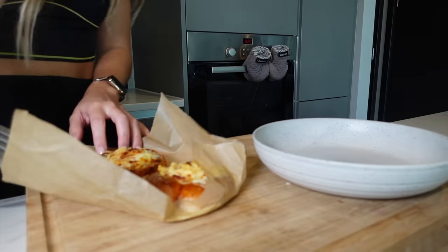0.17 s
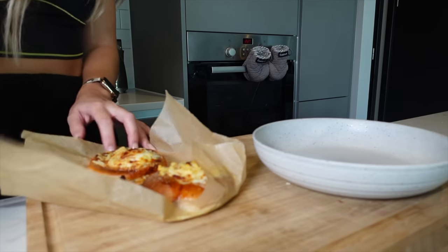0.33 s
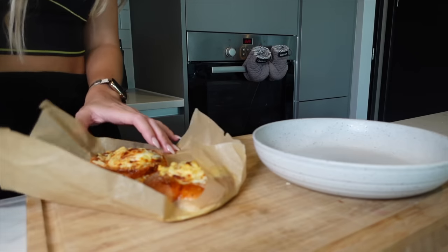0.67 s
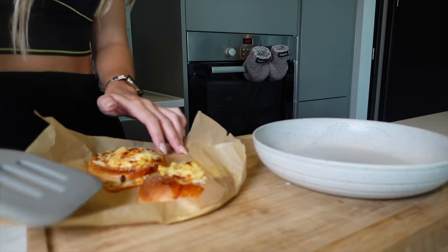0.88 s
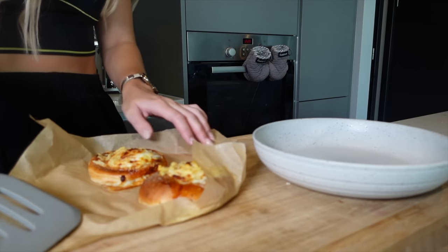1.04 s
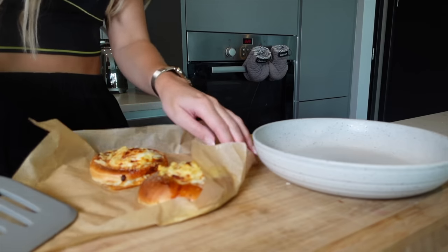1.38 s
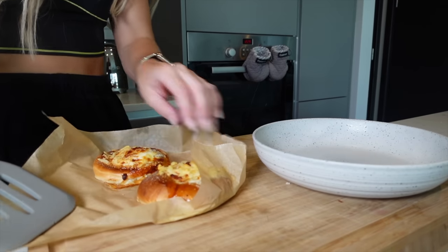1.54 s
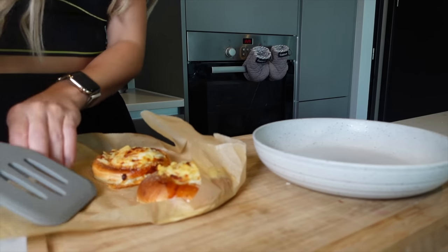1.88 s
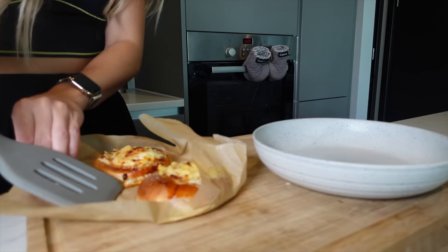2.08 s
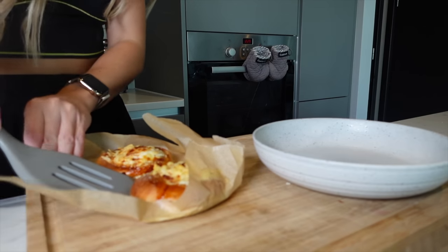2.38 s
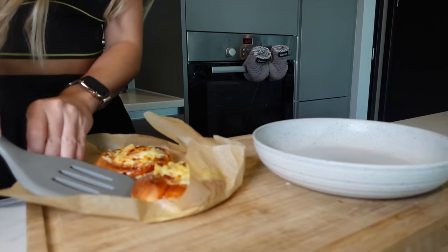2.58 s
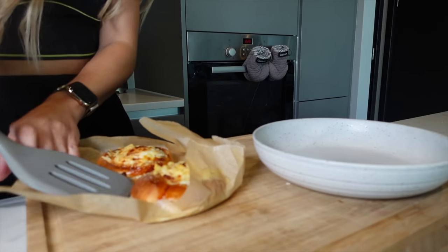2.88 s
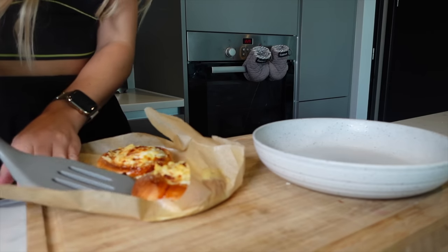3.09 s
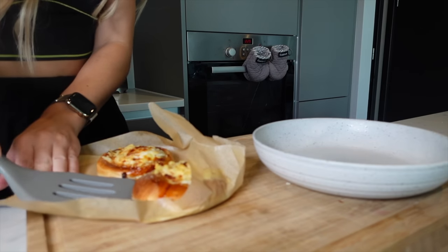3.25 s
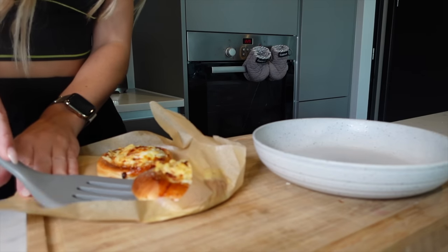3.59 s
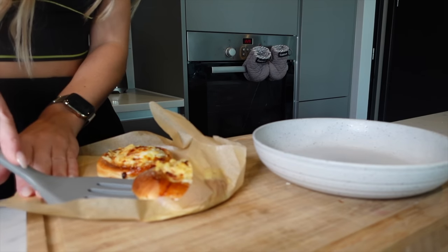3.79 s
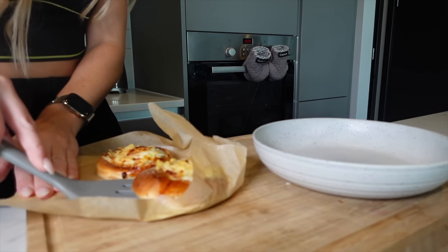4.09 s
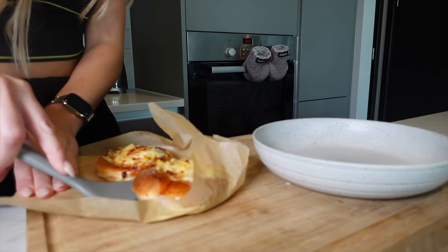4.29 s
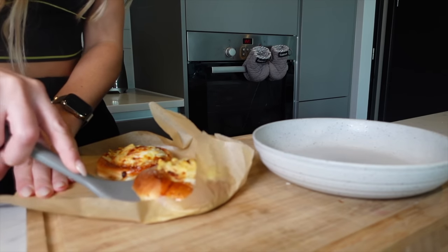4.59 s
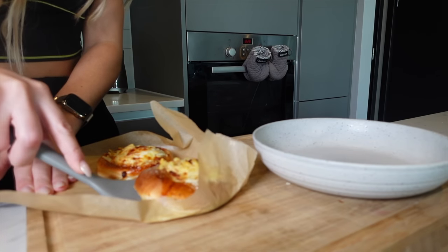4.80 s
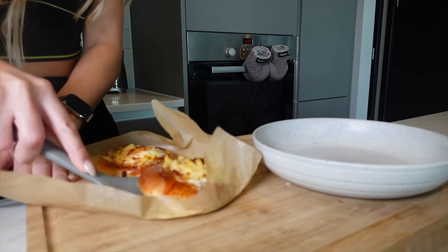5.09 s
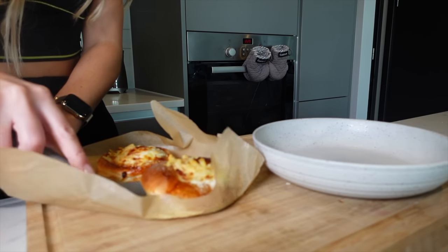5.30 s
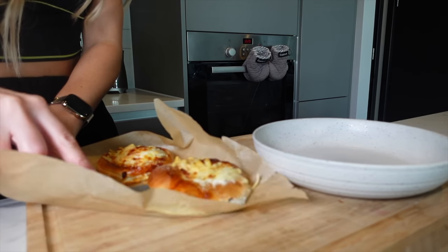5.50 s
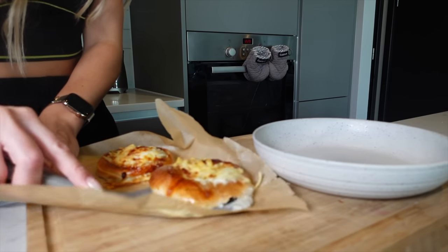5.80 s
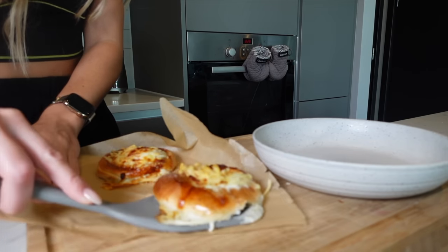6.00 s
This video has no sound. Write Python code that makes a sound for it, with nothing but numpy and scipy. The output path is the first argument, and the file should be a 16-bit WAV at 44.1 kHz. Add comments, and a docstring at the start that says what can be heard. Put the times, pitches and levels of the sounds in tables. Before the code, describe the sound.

Stiff baking paper crackles densely close up for three seconds, thins to faint rustling, then crunches briefly again in a hard-walled kitchen.

```python
"""A stiff sheet of baking paper is pulled open, pressed flat and scraped by a spatula on a board in a kitchen.
For 3 s creases buckle in dense sharp snaps, each ringing a small patch; tiny ones rustle, sliding surfaces hiss.
Then the snaps thin out and the rustle and hiss weaken; from about 5.4 s a last run of crunches follows, to 6.14 s.
Throughout, broad panels pop low now and then, hard walls answer and a low appliance rumble lies beneath."""
import sys
import numpy as np
from scipy import signal
from scipy.fft import rfft, irfft
from scipy.io import wavfile
from scipy.ndimage import uniform_filter1d

SR = 44100
rng = np.random.default_rng(int(sys.argv[2]) if len(sys.argv) > 2 else 0)


def dump(signal):
    """Clip the signal to [-1, 1] and save it as 16-bit WAV at the path in sys.argv[1]."""
    limited = np.clip(np.atleast_2d(signal).T, -1, 1)
    pcm = np.round(limited * 32767).astype(np.int16)
    wavfile.write(sys.argv[1], SR, pcm)


N = 270906

# Loud snaps of single creases: (time [s], patch peak [dB], patch pitch [Hz],
# crack peak re patch [dB], slip decay [ms])
SNAP_EVENTS = [(0.0453, -7, 2450, 0, 1), (0.1505, -6.5, 5700, -16, 26), (0.273, -5, 1830, -9, 1),
               (0.2724, -4.5, 5650, -26, 0.75), (0.304, -7, 5800, -32, 1), (0.36, -7, 5140, -19, 0.92),
               (0.4632, -5, 3490, -21, 3.1), (0.483, -7.5, 2570, -4, 0.88), (0.5384, -6, 6000, -9, 1),
               (0.647, -9.5, 5700, -2, 1.8), (0.72, -11.5, 3450, -17, 1.1), (0.733, -8, 6100, -14, 2.7),
               (0.844, -7.5, 5680, -8, 0.99), (0.8797, -4, 3520, -14, 9.6), (1.0034, -5.5, 4100, -16, 1.5),
               (1.015, -4.5, 3840, -15, 2.3), (1.027, -5.5, 5500, -14, 2.7), (1.0354, -7, 6500, -21, 1.6),
               (1.1023, -3.5, 6300, -7, 0.56), (1.2028, -11.5, 2650, -5, 1.9),
               (1.2962, -8, 3670, -12, 0.78), (1.317, -6, 3540, -10, 0.74), (1.3313, -5, 5210, -10, 1.3),
               (1.3812, 0, 3070, -32, 0.43), (1.4041, -11.5, 3800, -13, 0.8), (1.446, 3, 2220, -18, 0.71),
               (1.46, -16, 2290, -15, 1.6), (1.5127, -11, 3190, -16, 0.43), (1.5695, -8, 4870, -18, 0.59),
               (1.5753, -1.5, 1100, -10, 1.1), (1.5958, -4.5, 5170, -7, 0.8),
               (1.6138, -7.5, 2870, -13, 1.7), (1.6414, -8.5, 5760, -6, 2.8), (1.661, -7.5, 3200, -14, 2.4),
               (1.68, -3, 4530, -1, 0.48), (1.722, -11.5, 2500, -21, 4.4), (1.745, -5, 8200, -10, 3.7),
               (1.8182, -6.5, 2600, -2.5, 3.7), (1.8642, -9, 2810, -20, 0.57),
               (1.9099, -6, 6000, -5.5, 1.06), (1.981, -8, 4400, -23, 0.96), (2.0322, -1, 4750, -10, 0.32),
               (2.047, -7, 3830, 1.5, 1.2), (2.119, -6.5, 1810, -14, 1.3), (2.1466, -9, 5500, -3, 1.5),
               (2.165, -11, 1900, -9, 0.46), (2.1972, -6.5, 4200, -12, 1.6), (2.2319, -2.5, 2980, -16, 1.9),
               (2.3097, -10, 6100, -5, 1.3), (2.3381, -3.5, 2420, -20, 0.2), (2.362, -16, 3570, -15, 1.5),
               (2.382, -3.5, 3790, -8, 0.61), (2.3848, -10, 3000, -6, 1.2), (2.4052, -10, 3660, -7, 1.5),
               (2.4076, -6, 5000, -4, 0.87), (2.417, 1.5, 2000, -25, 2.1), (2.4365, -5, 5900, -4, 4.9),
               (2.5057, -4.5, 2300, -6, 0.76), (2.545, -11, 4650, -15, 1), (2.587, -7.5, 5770, -1, 0.57),
               (2.614, -4, 7440, -28, 1.05), (2.6308, -7.5, 5500, -1.5, 7), (2.6507, -5, 6800, -22, 4.4),
               (2.683, -8, 2320, -10, 2.3), (2.7507, -3.5, 5460, -8, 2.2), (2.8223, -13, 3720, -2, 2),
               (2.837, -0.5, 2150, -22, 1.3), (2.8876, -14, 3400, -7, 6), (2.9347, -5, 5860, -5, 2.6),
               (2.9598, -10, 4270, -5, 2.1), (2.9773, -5.5, 3940, -12, 13), (3.0192, -9.5, 6400, -8, 2),
               (3.037, -12, 8500, 3, 0.6), (3.096, -15.5, 4890, -1, 2.2), (3.1533, -9, 5260, -6.5, 1.5),
               (3.159, -17, 6000, 6, 1), (3.2565, -16, 2630, 7, 0.59), (3.268, -5, 3320, -25, 0.28),
               (3.2782, -10, 4850, -2, 1.8), (3.301, -5.5, 4130, -46, 0.79), (3.3234, -13.5, 3470, -6, 1.4),
               (3.428, -20, 2650, -21, 1.7), (3.467, -14, 4040, -15, 0.26), (3.513, -9, 3800, -34, 1.14),
               (3.567, -15, 2240, -16, 4.6), (3.618, -6, 4300, -29, 0.65), (3.629, -12, 3500, -1, 1.6),
               (3.6665, -19, 8400, 2, 0.6), (3.6902, -14, 3150, -11, 0.29), (3.6953, -10, 3300, -15, 0.78),
               (3.817, -18, 2920, -4, 0.45), (3.945, -16, 3600, -18, 2.5), (4.1, -11.5, 3740, -15, 1.7),
               (4.1508, -21, 3720, -17, 0.44), (4.2158, -9.5, 2560, -13, 3), (4.285, -23, 2860, -16, 2.5),
               (4.3, -11, 8900, -0.5, 0.92), (4.393, -18, 3520, -12, 2.5), (4.436, -14.5, 3750, -28, 1.6),
               (4.597, -29.5, 4300, -19, 1.2), (4.6398, -11.5, 6000, -21, 0.38),
               (4.6764, -16, 4640, -15, 1.4), (4.7236, -11, 3860, -24, 0.25), (4.726, -8, 3800, -27, 0.3),
               (4.829, -24, 3100, -20, 0.78), (4.8418, -25.5, 4100, -29, 1.9),
               (4.9004, -28, 2860, -10, 5.2), (4.917, -24.5, 3500, -4, 2.3),
               (5.0079, -6.5, 3850, -26, 0.55), (5.0446, -10.5, 3880, -19, 0.51),
               (5.1327, -23, 4570, -4, 0.86), (5.204, -16, 5900, -11, 0.43), (5.2236, -10, 3400, -16, 0.96),
               (5.2615, -9.5, 5870, -16, 2), (5.3597, -12.5, 5300, -14, 1.9), (5.4042, -4, 4600, -26, 0.88),
               (5.4236, -16, 8500, -8, 1), (5.43, -11.5, 3500, -17, 3.2), (5.4458, -5, 3300, -17, 1.1),
               (5.4603, -17, 4200, 0, 0.76), (5.48, -7.5, 3580, -10, 2), (5.5, -14, 3460, -14, 3.5),
               (5.523, -12, 3600, -16, 4.2), (5.5423, -17, 3570, -2, 1.5), (5.549, -8.5, 3300, -23, 4.5),
               (5.581, -9, 7550, 1, 1), (5.585, -8, 3500, -18, 0.8), (5.5998, -8.5, 2800, -5, 2.5),
               (5.619, -8, 5600, -9, 0.6), (5.713, -11, 6240, -2, 0.4), (5.817, -12, 5930, -8, 0.45),
               (5.8275, -9.5, 2170, -18, 0.53), (5.8519, -1, 6560, -3, 0.74),
               (5.9325, -1.5, 5740, -4, 0.88), (5.9662, -8, 7750, -24, 0.59),
               (6.0508, -10, 7700, -26, 0.23), (6.0612, -5, 5970, -0.5, 1.04)]
# Crunches, each a fold or push of the sheet: (start [s], rustle level [dB], hold [ms],
# fizz re rustle [dB], large-area flexing re rustle [dB], centre pitch [Hz])
CRUNCH_EVENTS = [(0.0, -19, 42, -12.5, -10.5, 3330), (0.134, -17, 11, -7.5, -8, 3700),
                 (0.341, -22.5, 13, -7.5, -15, 4330), (0.46, -23, 29, -5.5, -10, 4200),
                 (0.574, -23.5, 17, -9.5, -12, 3970), (0.645, -21.5, 20, -11, -18, 3800),
                 (0.82, -26.5, 56, -9, -8, 3700), (0.868, -17, 6.8, -12, -16, 3780),
                 (0.992, -21.5, 70, -7, -14.5, 4870), (1.254, -26, 8.8, -4, -15, 3660),
                 (1.33, -21, 61, -15, -11, 3120), (1.435, -18, 13, -16, -12, 3000),
                 (1.505, -21, 85, -15.5, -6, 3230), (1.589, -19.5, 83, -13.5, -13.5, 3200),
                 (1.808, -16, 6.3, -15, -12, 3430), (1.906, -25.5, 31, -15, -17, 3630),
                 (2.046, -19.5, 44, -15, -17, 4050), (2.14, -23, 49, -21, -18, 3850),
                 (2.284, -26, 230, -27, -10, 3350), (2.397, -23, 60, -2, -20, 3920),
                 (2.46, -26, 32, 7, -10, 4300), (2.606, -24.5, 97, -10.5, -14.5, 3830),
                 (2.741, -17.5, 9.4, -13, -10.5, 3700), (2.818, -23.5, 9.1, -15, -9.5, 3600),
                 (2.926, -16.5, 9.3, -18, -11.5, 3520), (2.969, -15.5, 7.5, -12, -12.5, 3580),
                 (3.09, -27.5, 6.8, -12, -28, 3700), (3.155, -32, 79, -16, -14, 3780),
                 (3.252, -26.5, 36, -7, -20.5, 3930), (3.509, -35, 51, 2, -15, 4260),
                 (3.551, -24.5, 14, -16, -20, 4300), (3.685, -34, 33, -9, -17, 3550),
                 (3.93, -33, 23, -9.5, -31, 4500), (4.662, -36, 12, -15, -19, 4030),
                 (4.9, -38.5, 18, -32, -11, 3100), (5.004, -28, 11, -16.5, -19, 3700),
                 (5.271, -29.5, 6, -11, -16, 4000), (5.429, -27, 85, -17, -11, 3900),
                 (5.479, -25, 66, -15.5, -17.5, 3700), (5.58, -23.5, 31, -21, -23, 3240),
                 (5.689, -25, 17, -31, -17.5, 3360), (5.805, -25, 67, -17, -18, 3600),
                 (5.926, -26, 35, -4, -13.5, 3930), (6.056, -30, 23, -3, -17, 3930),
                 (6.128, -24.5, 20, -8, -18, 4100)]
# Sheet dragged along between crunches: (time [s], rustle level [dB],
# fizz re rustle [dB], flexing re rustle [dB])
DRAG_CURVE = [(0, -34.5, -16, -8.5), (0.75, -27.5, -19, -12.5), (1.2, -29.5, -18.5, -11),
              (1.5, -28.5, -17, -20), (2.0, -32, -14, -8.5), (2.3, -26.5, -12, -16.5),
              (2.9, -40.5, -37, -14), (3.4, -34.5, -17.5, -14), (3.75, -35, -17, -18),
              (4.0, -36, -7, -15.5), (4.18, -31.5, -15, -19.5), (4.35, -42, -17, -7.5),
              (4.6, -48, -18, -5.5), (5.2, -43.5, -13, -4), (5.6, -38, -9, 1), (6.14, -35, -32, -14)]
# Spectrum of the sliding hiss: (frequency [Hz], density [dB per Hz])
RUB_SPECTRUM = [(700, -6), (1500, 8.5), (3000, 8), (5500, 2.5), (8000, -18)]
# Spectrum of the top of the sliding hiss: (frequency [Hz], density [dB per Hz])
FIZZ_SPECTRUM = [(6500, -2), (8500, -2.5), (12000, -12), (15500, -15)]
# Broad panels flipping over: (time [s], swing before decay [dB], pitch [Hz])
POP_EVENTS = [(0.042, -11.5, 1090), (0.146, -16, 796), (0.882, -10.5, 1270), (1.542, -27, 253),
              (1.643, -10, 1230), (1.68, -21, 428), (1.696, -11.5, 1260), (2.105, -32, 243),
              (2.418, -23.5, 435), (2.751, -24, 455), (4.724, -31, 790), (4.9, -28, 915),
              (5.007, -28, 1000)]
# Spectrum of the kitchen rumble: (frequency [Hz], density [dB per Hz])
RUMBLE_SPECTRUM = [(60, -34), (95, -10), (127, -4), (165, -5), (210, 1), (330, -1), (600, -15)]
# Course of the rumble: (time [s], level [dB], deep hum level [dB])
RUMBLE_CURVE = [(0, -51.5, -82), (1.1, -54, -62), (2.0, -50.5, -72.5), (3.0, -53, -69), (4.3, -60, -76),
                (6.14, -54.5, -85)]

CRUNCH_RISE_MS, CRUNCH_FADE_DB_PER_S = 3.6, 195
DRAG_CENTRE_HZ = 3920
CREASE_SAMPLES = 768
CRACK_BAND_HZ, FLAP_BAND_HZ = (7000, 12500), (560, 1300)
TICK_RATIO = 2.09  # first jerk of a crease over the slip noise
SNAP_FLAP_DB = 4  # flap peak over the flexing level at that time
PATCHY_SCALE = 0.35  # how far each half octave of hiss swells by itself
POP_DECAY_CYCLES = 2.53  # to 1/e
ROOM_T60_S, ROOM_DB, ROOM_TOP_HZ = 0.55, -13.5, 12900
LOW_PASS_HZ = 15900
OPPOSITE = np.array([[1], [-1]])  # left, right signs of a side signal


def undb(db):
    """Amplitude gain of a level in dB."""
    return 10 ** (np.asarray(db) / 20)


def unit(x):
    """Scale to rms 1."""
    return x / np.sqrt(np.mean(x ** 2))


def curves(table):
    """Every column after time, interpolated at each sample."""
    time_s, *columns = np.transpose(table)
    return [np.interp(np.arange(N) / SR, time_s, c) for c in columns]


def coloured(points):
    """Noise of rms 1 with a (Hz, dB) spectrum, falling away outside it."""
    hz, db = np.transpose(points)
    bin_hz = np.maximum(np.arange(N // 2 + 1) * SR / N, 1)
    log_hz = np.log(np.r_[hz[0] / 4, hz, hz[-1] * 2])
    shape_db = np.interp(np.log(bin_hz), log_hz, np.r_[db[0] - 30, db, db[-1] - 30])
    return unit(irfft(rfft(rng.standard_normal(N)) * undb(shape_db), N))


def band(x, lo_hz, hi_hz):
    """Butterworth band-pass along the last axis."""
    sos = signal.butter(2, [lo_hz, min(hi_hz, .45 * SR)], "band", fs=SR, output="sos")
    return signal.sosfilt(sos, x)


def walk(rate_hz):
    """Random levels at this rate, slewed between; standard deviation near 3.5."""
    hold = int(SR / rate_hz)
    steps = np.repeat(rng.standard_normal(N // hold + 1), hold)
    return 4.3 * uniform_filter1d(steps, hold)[:N]


def buckle(time_s, db, hz, crack_db, flap_db, slip_ms, sharp, spread_db, lag_samples):
    """Each crease slips for a moment: its patch rings, the fold cracks, the sheet around it flaps."""
    chance = rng.standard_normal((len(time_s), CREASE_SAMPLES + 3))
    slip_noise = chance[:, 3:]
    t = np.arange(CREASE_SAMPLES) / (slip_ms[:, None] * SR / 1000)  # in slip decays
    push = slip_noise * np.exp(-t) * np.minimum(t / 0.31 + 0.27, 1)
    push = push + TICK_RATIO * np.sign(slip_noise[:, :1]) * (np.arange(CREASE_SAMPLES) == 1)

    # resonance of the patch
    bin_hz = np.maximum(np.arange(CREASE_SAMPLES // 2 + 1), 1) * SR / CREASE_SAMPLES
    tune = bin_hz / hz[:, None]
    quality = np.minimum(sharp * np.exp(0.7 * chance[:, 1:2]), 7)
    ring = irfft(rfft(push) / (1 + 1j * quality * (tune - 1 / tune)), CREASE_SAMPLES)
    patch = band(ring + undb(-9) * push, 1190, 8130)  # neighbouring patches fill in around the ring
    crack = band(push, *CRACK_BAND_HZ)
    flap = band(push, *FLAP_BAND_HZ)

    sound = 0
    for part, part_db in ((patch, 0 * db), (crack, crack_db), (flap, flap_db)):
        peak = np.abs(part).max(axis=1, keepdims=True)
        sound = sound + part / peak * undb(db + part_db)[:, None]

    # random level balance and, independently, a random tiny lag between the ports
    pan = undb(spread_db * chance[:, 2:3] / 2)
    shift = lag_samples * chance[:, :1] * np.gradient(sound, axis=1)
    ports = (sound * pan + shift, sound / pan - shift)
    place = (time_s * SR).astype(int)[:, None] + np.arange(CREASE_SAMPLES)
    return np.array([np.bincount(place.ravel(), p.ravel(), N + CREASE_SAMPLES)[:N] for p in ports])


def snaps(flexing_db):
    """Large creases buckle; each flaps as strongly as the sheet is flexing then."""
    time_s, db, hz, crack_db, slip_ms = np.transpose(SNAP_EVENTS)
    just_after = ((time_s + 0.004) * SR).astype(int)
    flap_db = flexing_db[just_after] + SNAP_FLAP_DB - db
    return buckle(time_s, db, hz, crack_db, flap_db, slip_ms, sharp=8.2, spread_db=1.5, lag_samples=0.042)


def rustle(db, fizz_db, flex_db, centre_hz, count=3000):
    """Small creases buckle in quick flurries: many faint, few strong, each with its own colour and length."""
    when, size, pitch, length, edge = rng.random((count, 5)).T
    at = (when * N).astype(int)
    flurry_db = 1.1 * walk(140)
    above_db = np.minimum(flurry_db[at] - 5.6 * np.log(1 - size), 14)
    grain_db = db[at] + above_db - 1.5
    hz = centre_hz[at] * np.exp(1.6 * (pitch - .5))
    crack_db = fizz_db[at] + 10 * (edge - .5) - 2.0
    slip_ms = 0.2 + 0.5 * length ** 2
    return buckle(when * N / SR, grain_db, hz, crack_db, flex_db[at] - 5.5, slip_ms,
                  sharp=2.2, spread_db=0.3, lag_samples=0.06)


def slide(db, fizz_db, flex_db):
    """Paper, fingers and spatula rub: a hiss flickers in level; its half octaves swell slightly, independently."""
    flicker_db = 0.8 * walk(220)
    mid, side = (unit(band(rng.standard_normal(N), *FLAP_BAND_HZ)) for _ in range(2))
    flex = mid + undb(-20.5) * side * OPPOSITE

    rub = coloured(RUB_SPECTRUM)
    low_db = 0.17 * (flex_db + 14.5)  # the lower hiss grows with the flexing
    edges_hz = 500 * 2 ** np.arange(0, 5.1, .5)
    patchy = 0
    for lo_hz, hi_hz in zip(edges_hz, edges_hz[1:]):
        swell_db = PATCHY_SCALE * walk(14) + (hi_hz < 2100) * low_db
        patchy = patchy + undb(swell_db) * band(rub, lo_hz, hi_hz)

    fizz = undb(fizz_db + 4.0) * coloured(FIZZ_SPECTRUM)
    hiss = undb(-7.5) * unit(patchy) + fizz + undb(flex_db - 7.0) * flex
    return undb(db + flicker_db) * hiss


def handling():
    """Rustle level and colour: a crunch rises fast, holds and dies away; stronger motions weigh more in the colour."""
    step = 32  # samples per control point
    start_s, db, held_ms, *colour = np.transpose(CRUNCH_EVENTS)
    t = np.arange(N // step + 2) * step / SR - start_s[:, None]
    fade_db = -CRUNCH_FADE_DB_PER_S * np.maximum(t - held_ms[:, None] / 1000, 0)
    rise = np.clip(1000 * t / CRUNCH_RISE_MS, 0, 1)
    power = undb(2 * (db[:, None] + fade_db)) * rise

    drag_db, *drag_colour = (np.r_[c[::step], c[-1], c[-1]][:t.shape[1]] for c in curves(DRAG_CURVE))
    drag = undb(2 * drag_db)
    total = power.sum(axis=0) + drag
    mixed = [(c @ power + rest * drag) / total for c, rest in zip(colour, drag_colour + [DRAG_CENTRE_HZ])]
    controls = [10 * np.log10(total)] + mixed
    return [np.interp(np.arange(N) / step, np.arange(len(total)), c) for c in controls]


def pops():
    """Each broad panel flips over, swings a few cycles at its own pitch and is still."""
    time_s, db, hz = np.transpose(POP_EVENTS)[:, :, None]
    span = np.arange(2 * CREASE_SAMPLES)
    cycles = span / SR * hz
    envelope = np.exp(-cycles / POP_DECAY_CYCLES) * np.minimum(cycles / 0.32, 1)
    swing = undb(db) * np.sin(2 * np.pi * cycles) * envelope
    place = (time_s * SR).astype(int) + span
    return np.bincount(place.ravel(), swing.ravel(), N)[:N]


def room(x):
    """Diffuse echoes from hard walls, with a left-right difference added in a low band."""
    t = np.arange(SR // 2) / SR
    decay = np.exp(-np.log(1000) * t / ROOM_T60_S) * np.minimum(t / 0.0051, 1)
    tails = band(rng.standard_normal((2, len(t))) * decay, 67, ROOM_TOP_HZ)
    mid, side = (signal.fftconvolve(x, h / np.sqrt(np.sum(h ** 2)))[:N] for h in tails)
    return undb(ROOM_DB) * (mid + undb(-4.5) * band(side, 170, 710) * OPPOSITE)


def hum(lo_hz, hi_hz):
    """Narrow noise band of rms 1."""
    return unit(band(rng.standard_normal(N), lo_hz, hi_hz))


def rumble():
    """Low appliance noise with a deeper hum that swells and fades, mostly alike at both ports."""
    db, deep_db = curves(RUMBLE_CURVE)
    mid, side = (undb(db) * coloured(RUMBLE_SPECTRUM) + undb(deep_db) * (hum(49, 84) + 2.4 * hum(120, 139))
                 for _ in range(2))
    return mid + undb(-10.5) * side * OPPOSITE


def scene():
    """Paper close to the microphone, its echoes and the rumble."""
    db, fizz_db, flex_db, centre_hz = handling()
    paper = pops() + snaps(db + flex_db)
    paper = paper + rustle(db, fizz_db, flex_db, centre_hz)
    paper = paper + slide(db, fizz_db, flex_db)
    return paper + room(paper.mean(axis=0)) + rumble()


def record(dry):
    """The loudest peaks are rounded and the deep bass dropped; a steep low-pass leaves hardly anything above 15.9 kHz."""
    rounded = np.tanh(.8 * dry) / .8
    lean = signal.sosfilt(signal.butter(2, 62, "high", fs=SR, output="sos"), rounded)
    return signal.sosfilt(signal.ellip(10, .2, 80, LOW_PASS_HZ, fs=SR, output="sos"), lean)


dry = scene()
out = record(dry)
dump(out)
```